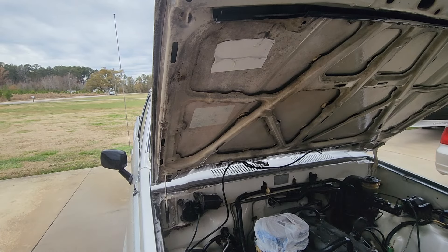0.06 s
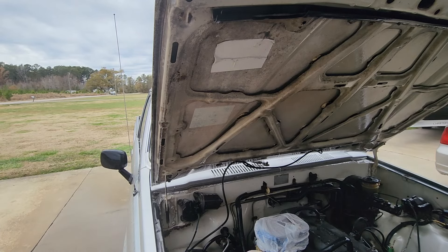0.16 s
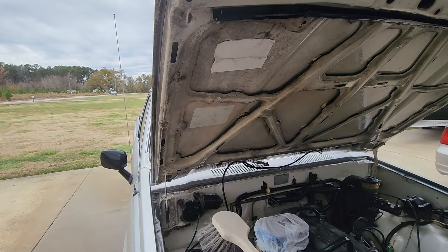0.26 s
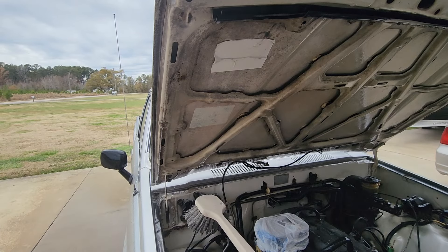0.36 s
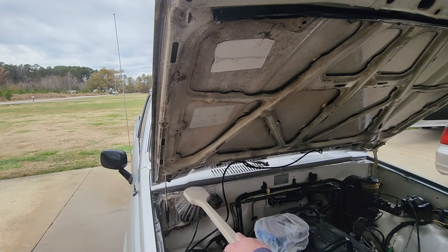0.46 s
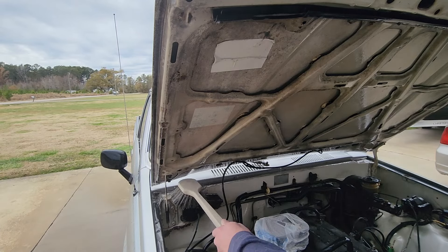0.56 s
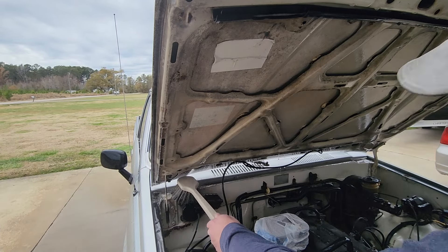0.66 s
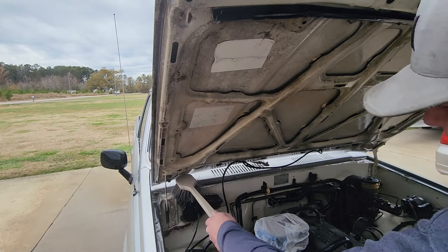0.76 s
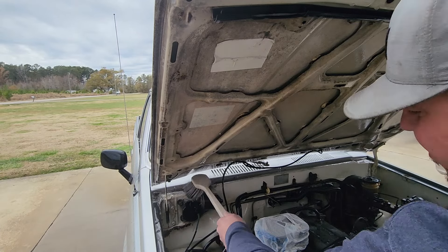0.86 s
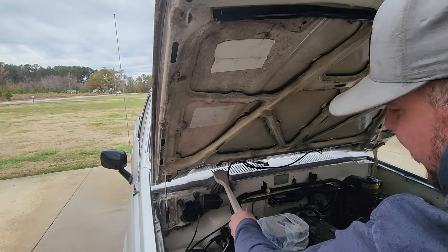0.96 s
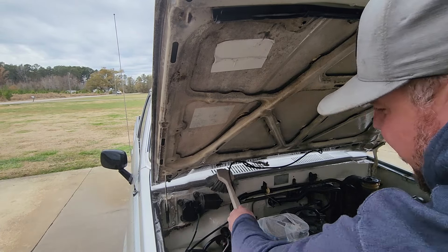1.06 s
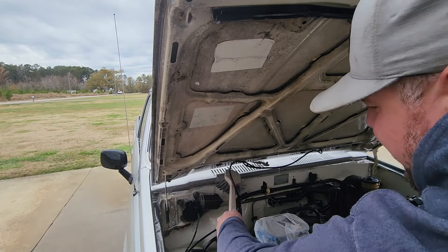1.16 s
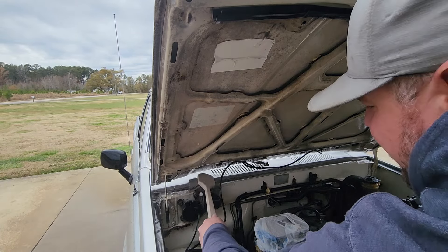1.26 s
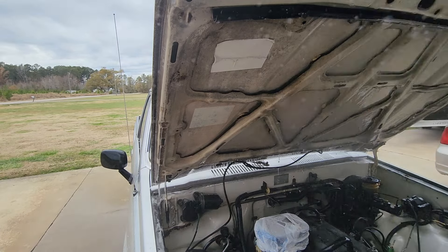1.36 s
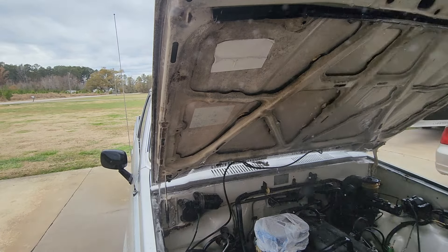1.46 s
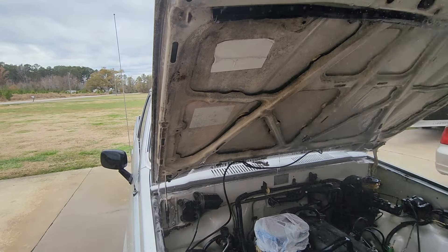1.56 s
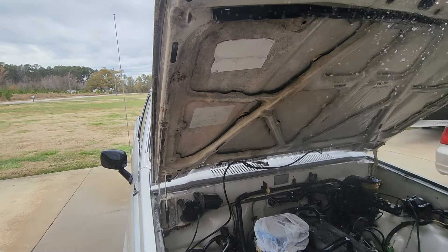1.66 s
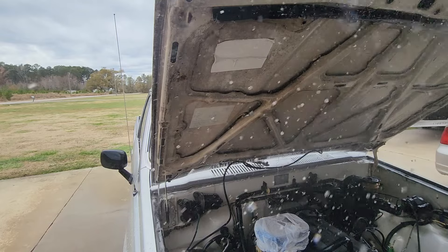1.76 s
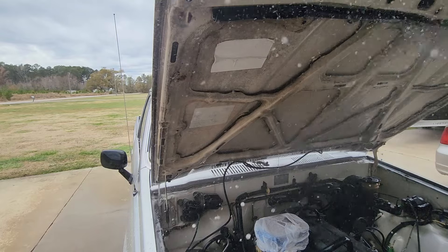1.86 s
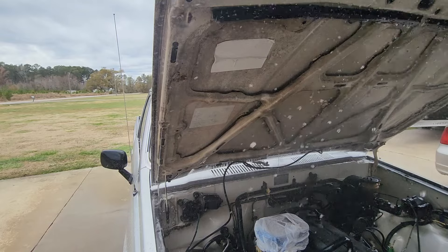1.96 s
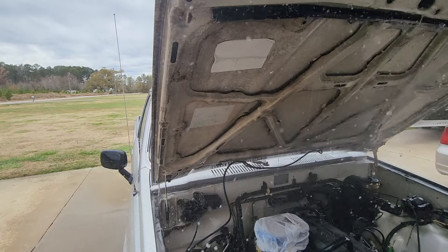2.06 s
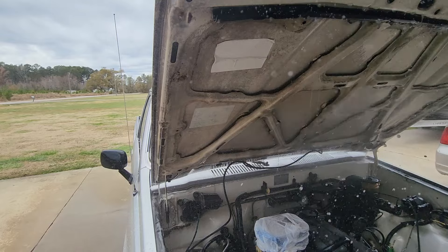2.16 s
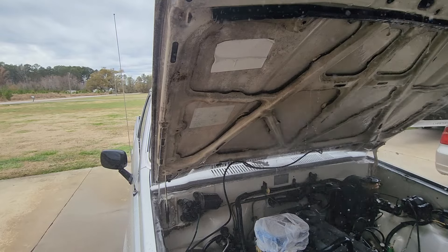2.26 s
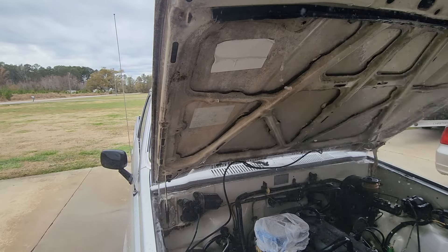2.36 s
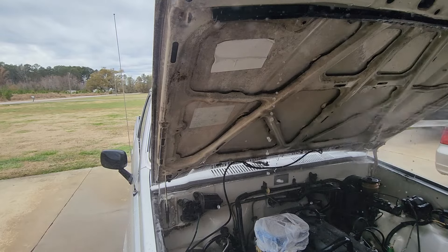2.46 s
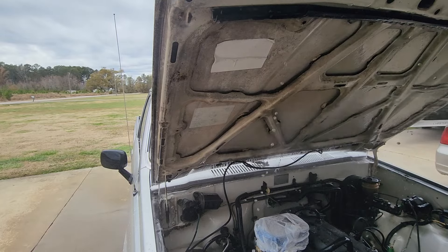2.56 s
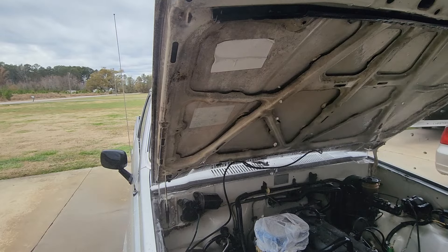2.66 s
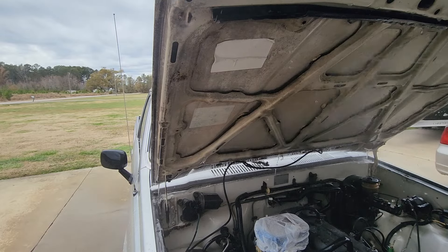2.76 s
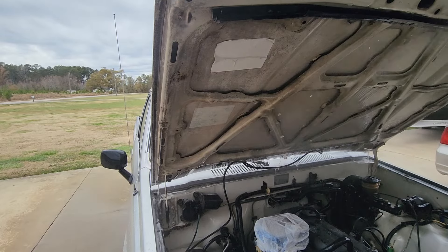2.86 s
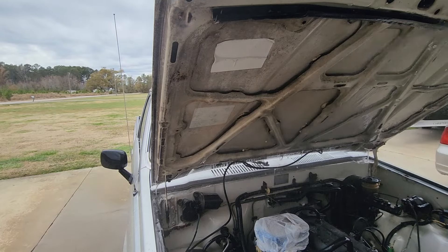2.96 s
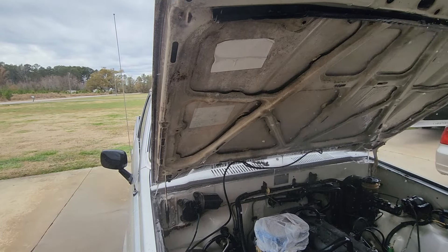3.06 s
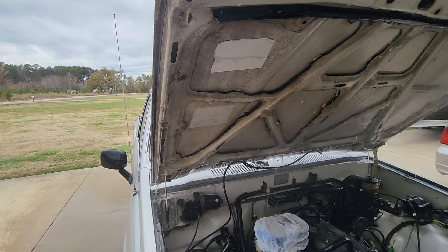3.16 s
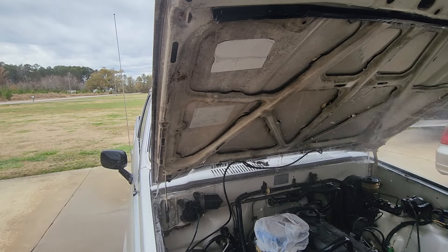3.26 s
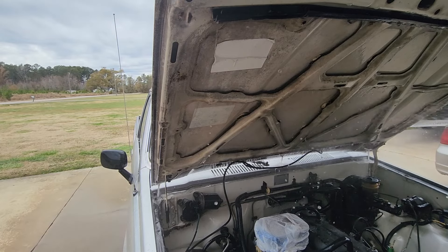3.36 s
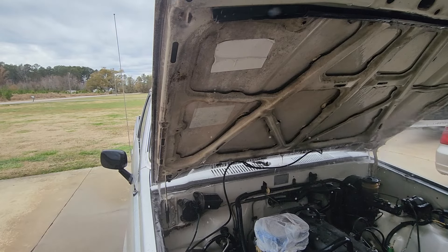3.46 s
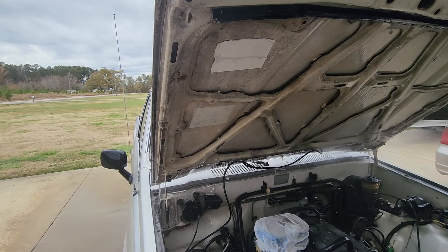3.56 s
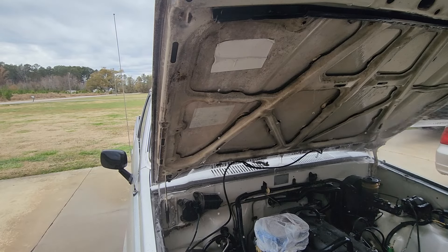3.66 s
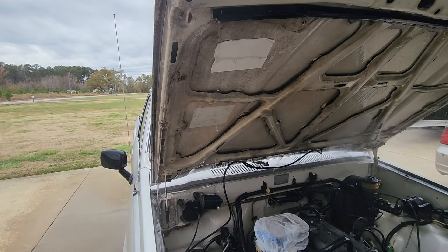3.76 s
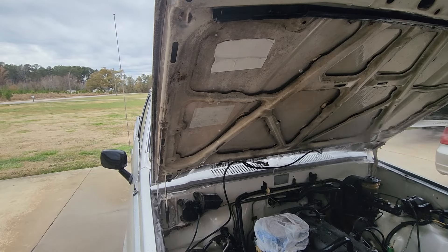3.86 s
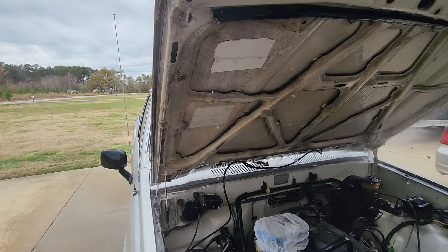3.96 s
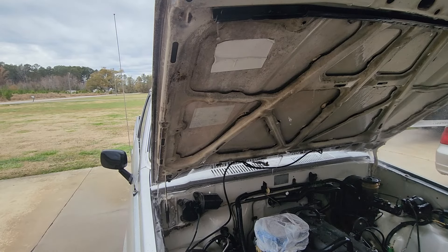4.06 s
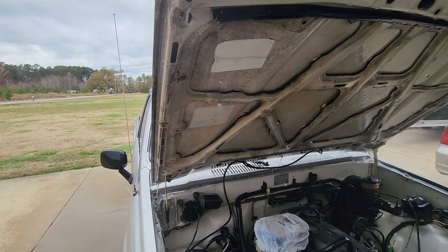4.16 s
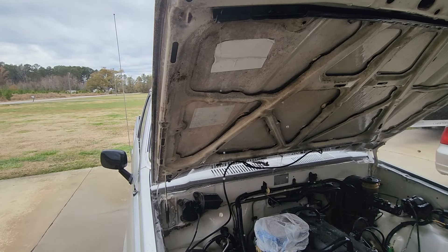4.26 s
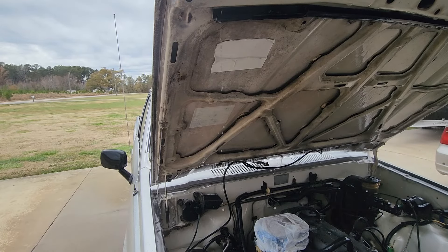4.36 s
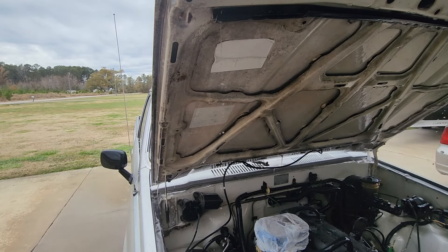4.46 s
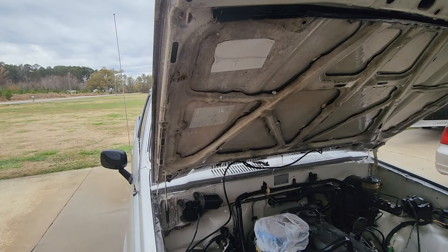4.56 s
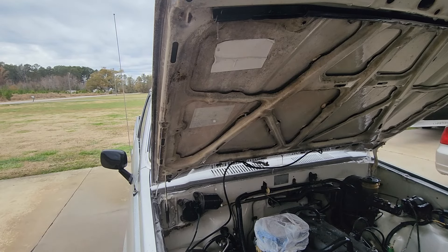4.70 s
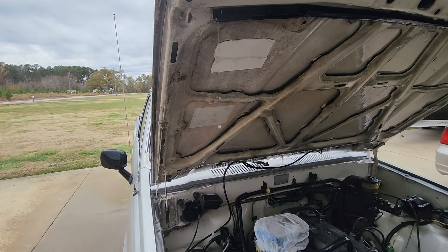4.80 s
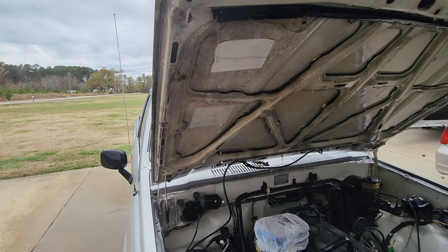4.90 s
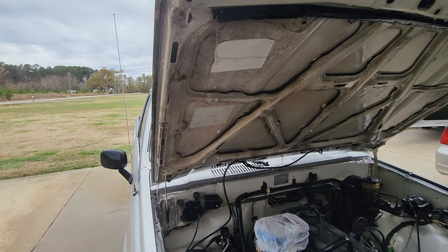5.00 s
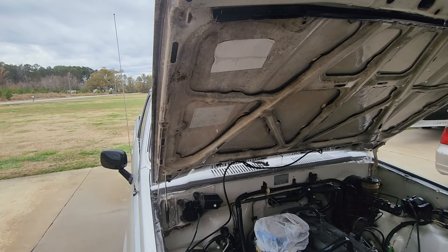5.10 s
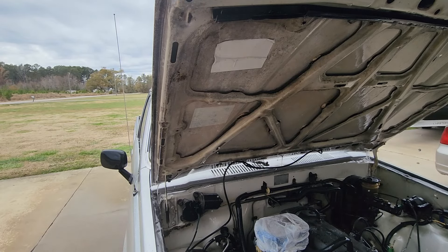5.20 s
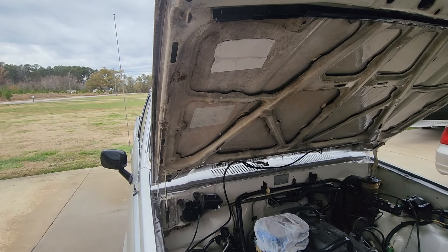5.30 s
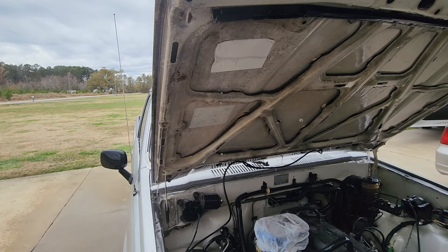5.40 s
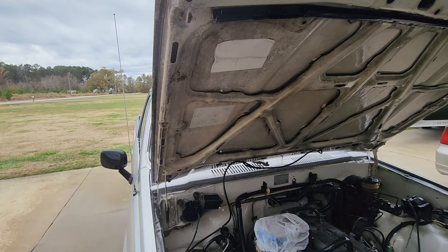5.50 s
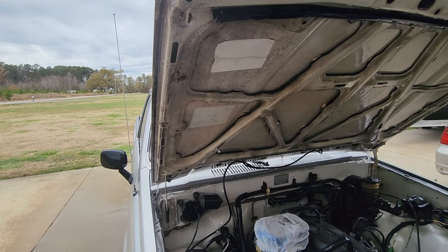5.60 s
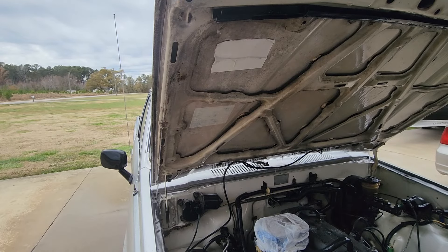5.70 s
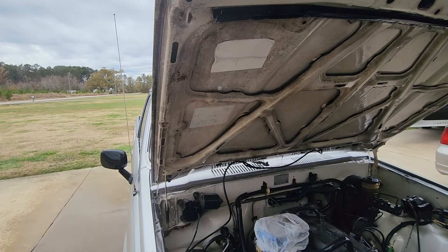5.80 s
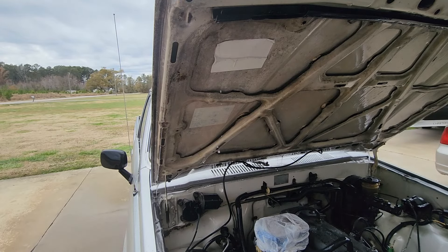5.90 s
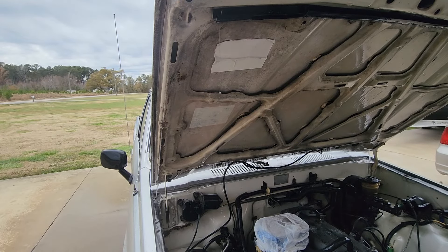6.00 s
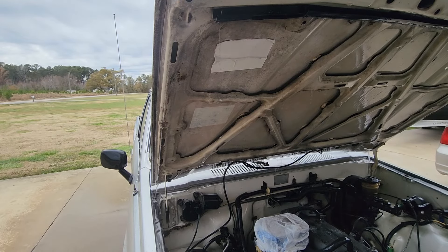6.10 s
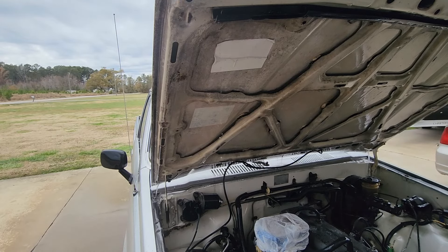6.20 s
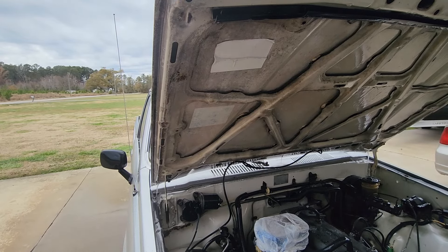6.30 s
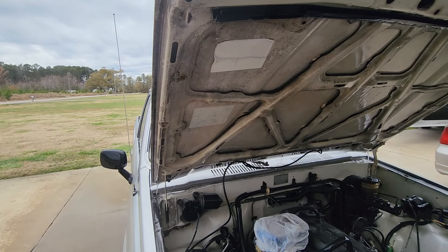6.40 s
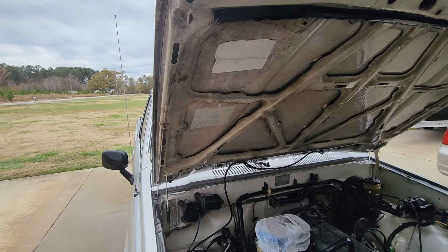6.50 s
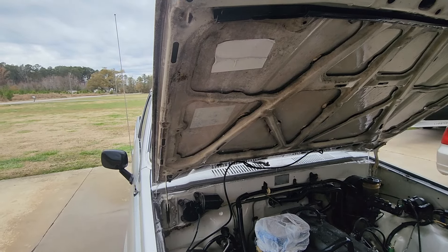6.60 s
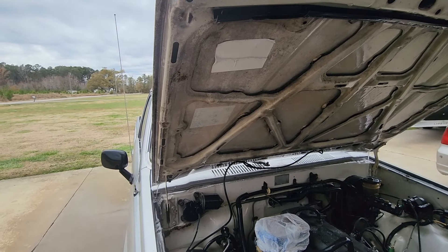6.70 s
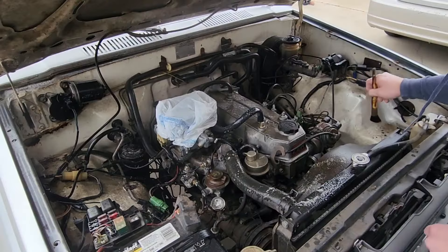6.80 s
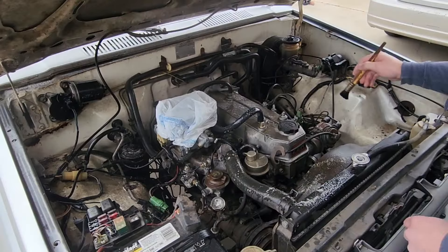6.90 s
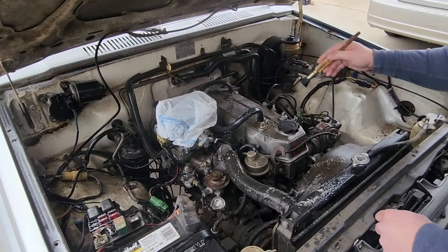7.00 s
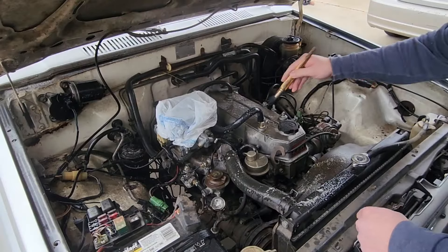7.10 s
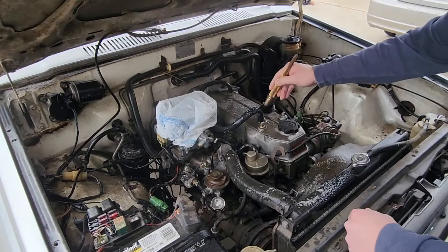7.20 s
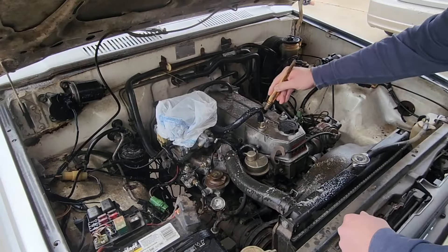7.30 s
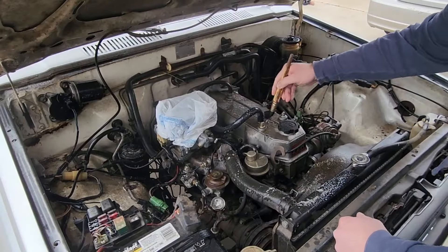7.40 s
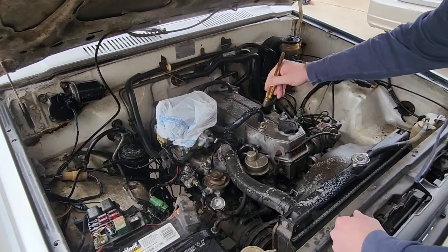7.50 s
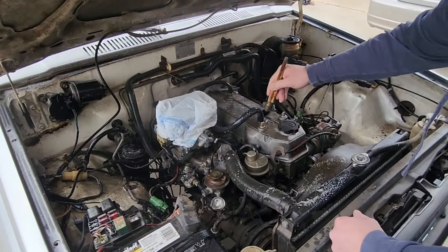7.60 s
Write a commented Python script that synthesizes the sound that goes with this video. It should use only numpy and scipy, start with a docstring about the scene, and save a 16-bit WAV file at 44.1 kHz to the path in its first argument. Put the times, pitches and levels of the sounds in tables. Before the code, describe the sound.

Outdoors, bristles rasp on metal with one hard clank, water blasts an engine compartment, then suds, drips and light brushing over a low motor hum.

```python
"""A hose jet sweeps an engine bay: random drop impacts excite panels, splash, and blow in hollows.
Around it a wet brush scrubs, its stick-slip impacts hissing and rubbing the metal; it knocks the
sheet metal, once hard, as damped modes. Soapy scrubbing follows with drips and small squelches,
as short resonances, and at last a little brush dabs. A distant motor rumbles below: noise and a hum."""
import sys
import numpy as np
from scipy import signal
from scipy.fft import rfft, irfft
from scipy.io import wavfile
from scipy.ndimage import uniform_filter1d

SR = 44100
rng = np.random.default_rng(int(sys.argv[2]) if len(sys.argv) > 2 else 0)


def pcm_store(signal):
    """Save signal as 16-bit PCM."""
    levels = np.round(np.clip(np.atleast_2d(signal), -1, 1) * 32767)
    wavfile.write(sys.argv[1], SR, levels.astype(np.int16).T)


N = 337365
TIME, FREQS = np.arange(N) / SR, np.maximum(np.arange(N // 2 + 1) * SR / N, 1)  # t/s, f/Hz

# Levels in the tables are relative: spectra are normalised, and sources may be trimmed in their functions.
# background: [t/s, motor rumble level/dB, outdoor air level/dB]
OUTDOOR_LEVELS = [(0, -43.5, -57), (1.3, -41, -53.5), (4.3, -42.5, -50.5), (5.5, -45, -53.5),
                  (7.0, -43.5, -52.5), (7.04, -45.5, -64)]
# spectra of the motor rumble, the outdoor air and the faint steady noise: [f/Hz, level/dB per Hz]
RUMBLE_SPECTRUM = [(12, -48), (20, -15.5), (64, 2), (102, 0.5), (111, -5.5), (124, -19), (135, -3.5),
                   (180, -27), (300, -120)]
AIR_SPECTRUM = [(79, -37), (135, 1), (247, -5.5), (280, -9), (350, -6), (387, -9), (650, -15), (840, -39),
                (1430, -120)]
STILLNESS_SPECTRUM = [(290, -35.5), (500, -8), (988, -5), (1130, -6.5), (1180, -5.5), (4800, -23.5),
                      (7640, -22), (16000, -29)]
# coherence of the two microphone ports: [f/Hz, likeness 0-1]
PORT_LIKENESS = [(25, .94), (80, .975), (250, .97), (600, .9), (950, .72), (1400, .3), (3000, .15),
                 (15000, .12)]
# echoes between hood and engine: [f/Hz, share of the direct sound]
BAY_ECHO_SHARE = [(500, .1), (1200, .45), (3000, .42), (15000, .3)]
# the brush head hits the bulkhead: [t/s, level/dB, contact cut-off f/Hz]
KNOCK_EVENTS = [(0.815, -51, 3500), (1.0305, -22, 6390), (1.115, -30.5, 450)]
# modes of the bulkhead: [f/Hz, level/dB, t60/s before extra damping]
BULKHEAD_MODES = [(146, -1, 0.55), (172, 0, 0.55), (470, -21, 0.41), (589, 8, 0.14), (758, 0, 0.27),
                  (1414, 6.5, 0.13), (1723, -11, 0.21), (2187, 3.5, 0.16), (2450, -18, 0.14)]
# loose parts that clatter with a blow: [band centre f/Hz, level/dB, t60/s]
CLATTER_BANDS = [(161, -10, 0.9), (373, -11.5, 0.48), (640, -1, 0.29), (1520, 3.5, 0.13),
                 (2350, 0.5, 0.075), (4000, -14, 0.06), (8000, -17, 0.14)]
# the brush nudges hoses and brackets: [t/s, f/Hz, level/dB]
BUMP_EVENTS = [(0.8149, 420, -36), (4.585, 362, -52), (4.716, 380, -50), (4.970, 800, -53),
               (5.05, 476, -46.5), (5.4445, 740, -47), (5.454, 800, -48), (5.545, 245, -40)]
# large drops fall on the parts below: [t/s, level/dB, ring f/Hz, t60/s, share of splash 0-1]
LARGE_DRIPS = [(0.787, -49, 2200, .03, .6), (4.385, -46, 4900, .03, .4), (4.438, -48, 1420, 0.038, 0.5),
               (4.453, -46, 684, .04, .6), (4.5, -46, 1400, .025, 0.5), (4.53, -46, 5500, .04, 0.5),
               (4.551, -46, 3310, 0.027, 0.37), (4.6308, -47, 2820, .03, .5),
               (4.7021, -42.5, 4030, .025, 0.6), (4.8074, -44, 3640, .02, .8),
               (4.9702, -43, 1300, 0.016, .8), (5.035, -46, 5900, .025, .4), (5.053, -50, 1860, 0.044, 0.6),
               (5.083, -47, 1500, .05, 1), (5.23, -40, 3360, 0.028, 0.4), (5.28, -40, 2050, 0.016, 0.76),
               (5.3033, -38, 3600, .025, .8), (5.436, -43, 3800, .025, .6), (5.4435, -41, 1600, .035, 1),
               (5.5137, -43, 2350, .04, 0.6), (5.657, -44, 2310, .025, 0.7), (5.6874, -42, 3970, .04, .25),
               (5.815, -43, 3620, 0.027, 0.9), (6.0777, -49, 1220, .05, .15), (6.1717, -43, 4700, .1, .95),
               (6.2362, -40, 2170, .05, 0.65), (6.323, -40, 2070, 0.017, 0.9),
               (6.3604, -42, 2190, .014, .8), (6.394, -50, 1900, 0.12, 0.8), (6.4601, -49, 2710, .045, .5),
               (6.6218, -42, 2730, 0.046, .4), (6.6615, -45, 1110, .06, 0.6), (6.7505, -45, 3300, .05, .5),
               (6.8554, -46, 1060, .025, 0.7), (6.916, -45, 8300, .02, 0.7), (6.956, -32, 1790, .009, .95)]
# suds squeezed under the bristles: [t/s, f/Hz, level/dB]
SQUELCH_EVENTS = [(4.838, 2940, -49), (5.383, 3030, -49), (5.525, 3400, -53), (5.61, 3040, -48),
                  (5.83, 3400, -49), (6.25, 2400, -54.5), (6.635, 2300, -51), (6.672, 1390, -46.5)]
# bristle tufts flick off edges: [t/s, level/dB, ring f/Hz]
FLICK_EVENTS = [(0.8142, -33, 4330), (1.4804, -28.5, 7310), (4.4726, -31, 7050), (4.64, -33, 3530),
                (4.813, -33, 7280), (5.2734, -27.5, 7600), (5.5443, -30, 6600), (5.6236, -29, 7100),
                (6.006, -32, 7630), (6.0456, -30, 5500), (6.237, -35, 7200)]
# bristle spectrum: [f/Hz, level/dB per Hz]
BRISTLE_SPECTRUM = [(350, -26), (600, -8.5), (919, -8.5), (1450, -6.5), (1680, -10), (1930, -6.5),
                    (2500, -4), (3580, 2), (5950, 1.5), (7410, 3.5), (9360, -2.5), (11800, 2), (14700, 2.5),
                    (16000, -2.5)]
# rasp resonances of the bulkhead under the bristles: [f/Hz, width/Hz, level/dB]
RASP_PEAKS = [(1475, 220, 6), (2003, 280, 7), (2155, 90, -0.5), (2806, 120, 0.5)]
# where the brush is: [t/s, left minus right level/dB]
BRUSH_POSITION = [(0, 2.5), (6.43, 3), (6.52, -13.5), (6.59, -1.5), (6.79, 0), (6.842, -8.5), (6.916, 3),
                  (6.98, -8.5), (7.3, 13)]
# light contact of the big brush between strokes: [start t/s, end t/s, rubbing level/dB, hiss level/dB]
LIGHT_CONTACT = [(0, 2.4, -65.5, -54.5), (4.3, 5.87, -56.5, -48.5), (5.879, 7.02, -58, -51.5)]
# strokes, those after 7.1 s by the little brush: [t/s, rise/s, hold/s, rubbing level/dB, hiss level/dB]
BRUSH_STROKES = [(0.043, .004, .012, -74, -43), (0.138, .01, .015, -68, -48.5),
                 (.215, .008, 0.024, -62, -47), (0.274, .008, .02, -57, -46),
                 (0.344, .05, .008, -58, -42.5), (0.383, .004, .004, -68, -45),
                 (0.504, .005, .006, -72, -44.5), (0.62, .008, 0.021, -74, -49.5),
                 (0.7, .006, .01, -72, -46), (0.81, .005, .03, -57, -49), (0.961, .003, 0.028, -53.5, -45),
                 (1.029, 0.01, 0.066, -47, -46), (1.154, 0.065, 0.048, -39.5, -38),
                 (1.204, .015, 0.02, -38.5, -48), (1.25, .02, 0.067, -52.5, -56),
                 (1.35, 0.025, 0.053, -45, -46.5), (1.46, 0.033, 0.029, -48, -44),
                 (1.482, 0.013, 0.078, -39, -37.5), (1.583, .02, 0.029, -54.5, -59),
                 (4.83, 0.024, .02, -60, -53), (5.186, .015, .025, -47, -44.5),
                 (5.283, 0.0062, 0.065, -51, -54), (5.43, .0055, .02, -51, -49),
                 (5.534, 0.22, 0.1, -52.5, -49), (5.752, 0.056, 0.055, -58, -51),
                 (6.014, .005, 0.07, -70, -47.5), (6.486, 0.0033, 0.069, -44, -41),
                 (6.6, .015, .02, -67, -48), (6.656, .01, 0.057, -56, -43.5),
                 (6.747, 0.017, 0.061, -55, -45), (6.826, .02, 0.018, -48.5, -51),
                 (6.971, 0.05, 0.034, -46.5, -43.5), (7.137, .04, 0.029, -86, -68),
                 (7.314, .004, 0.086, -78.5, -70.5), (7.425, 0.007, 0.0053, -53, -47),
                 (7.466, .015, .034, -69, -54), (7.609, 0.088, 0.016, -61.5, -51.5)]
# hollows that the jet blows in passing: [centre t/s, length/s, f/Hz, level/dB, glide/octaves per s]
HOLLOW_EVENTS = [(1.675, 0.081, 740, -24.5, -0.69), (1.698, 0.055, 3050, -23, -0.4),
                 (1.881, 0.074, 4130, -19.5, 0.041), (1.905, 0.11, 1607, -19, 0.49),
                 (1.97, 0.089, 900, -33, -1.9), (1.972, 0.043, 4300, -18, -1.3),
                 (1.997, .13, 2180, -17.5, -0.23), (2.033, 0.066, 2530, -25, -0.0086),
                 (2.05, .17, 804, -24, -.6), (2.146, 0.055, 2390, -18, -0.63),
                 (2.156, 0.062, 2190, -22, 0.25), (2.155, .17, 780, -24.5, -0.68),
                 (2.514, .07, 805, -24, 0.23), (2.827, 0.1, 544, -27, 0.047),
                 (3.228, 0.044, 2180, -20.5, -0.088), (3.292, 0.088, 1273, -22, -0.21),
                 (2.951, 0.064, 1310, -25, -0.0058), (4.185, .04, 1447, -25, 0)]
# the jet sweeps over the engine: [t/s, drumming on metal level/dB, splashing level/dB]
JET_SWEEP = [(1.65, -23, -23.5), (1.695, -22.5, -20), (1.76, -25.5, -21), (1.95, -30, -16),
             (2.16, -36, -18.5), (2.21, -35, -26.5), (2.26, -26.5, -25.5), (2.33, -25.5, -25.5),
             (2.52, -27.5, -25.5), (2.61, -30.5, -29), (2.68, -22.5, -25.5), (2.78, -31.5, -28),
             (2.81, -23, -25.5), (2.89, -30, -23.5), (2.945, -22, -22), (3.04, -25, -21), (3.09, -20, -21),
             (3.17, -28.5, -21.5), (3.3, -22, -20.5), (3.4, -27.5, -28), (3.45, -25.5, -27.5),
             (3.47, -24.5, -21.5), (3.55, -29, -22.5), (3.57, -23, -22.5), (3.67, -30.5, -27.5),
             (3.73, -26.5, -27), (4.03, -25, -24.5), (4.22, -31, -28), (4.32, -35.5, -33.5)]
# spectra of the spray and the fine mist: [f/Hz, level/dB per Hz]
SPRAY_SPECTRUM = [(65, -42), (110, -11.5), (156, -10), (320, -9.5), (371, -9.5), (557, -5.5), (622, -4.5),
                  (776, -4.5), (1000, -7), (1210, -6), (1680, -5.5), (2260, -6), (5080, -7.5), (7490, -7.5),
                  (9000, -13), (11700, -39.5), (19800, -120)]
MIST_SPECTRUM = [(5590, -52), (9500, -12.5), (11500, -4), (14900, -3.5), (15700, -5), (16000, -7)]
# panel resonances under the jet: [f/Hz, width/Hz, level/dB]
PANEL_PEAKS = [(160, 22, 7), (383.5, 34, 5), (508, 35, 4.5), (558.5, 26, 6.5), (770, 71, 2.5),
               (935, 18, 1.5), (1258, 110, 3.5), (1540, 46, 3.5)]

JET_OPENS_S, JET_CLOSES_S, JET_FADE_DB_PER_S = 1.6435, 4.237, 146
JET_LAG_S = 0.0003026  # delay of the right port behind the left


def from_db(db):
    """Amplitude ratio: decibels to gain."""
    return 10 ** (np.asarray(db) / 20)


def rms_one(x):
    """Energy normalisation: scale to rms 1."""
    return x / np.sqrt(np.mean(x ** 2) + 1e-20)


def in_time(rows):
    """Linear interpolation: each column of a curve at every sample."""
    s, *columns = np.transpose(rows)
    return [np.interp(TIME, s, column) for column in columns]


def at_hz(points, hz):
    """Logarithmic interpolation: read a spectrum on a log-frequency axis."""
    known_hz, values = np.transpose(points)
    return np.interp(np.log(hz), np.log(known_hz), values)


def likeness(hz):
    """Spatial coherence: how alike the two ports hear a frequency."""
    return np.clip(at_hz(PORT_LIKENESS, hz), 0, 1)


def pan(db):
    """Interaural level difference: left and right gains."""
    return from_db(np.array([[.5], [-.5]]) * db)


def gate(start, end):
    """Switching envelope: on between two times, with 3 ms edges."""
    return np.interp(TIME, [start - .003, start, end, end + .003], [0, 1, 1, 0])


def drift(rate):
    """Random modulation: straight lines between chance values, rate per second, rms 1."""
    knots = rng.standard_normal(4096)
    return rms_one(np.interp(TIME * rate, np.arange(len(knots)), knots))


def noise(size=N):
    """Gaussian noise: two unrelated white channels."""
    return rng.standard_normal((2, size))


def partly_alike_noise(size, hz):
    """Partial coherence: common and separate noise mixed as the ports hear this frequency."""
    alike = likeness(hz)
    return np.sqrt(alike) * rng.standard_normal(size) + np.sqrt(1 - alike) * noise(size)


def grains(per_s, spread_db):
    """Shot noise: two unrelated streams of tiny impacts of uneven size, rms 1."""
    size_db = spread_db * np.minimum(rng.exponential(1, (2, N)), 5)
    impacts = from_db(size_db) * rng.choice([-1, 1], (2, N))
    return rms_one(impacts * (rng.random((2, N)) < per_s / SR))


def colour(pair, spectrum, peaks=(), lag_s=0, low_hz=0, high_hz=SR, order=4):
    """Spectral filtering with partial coherence: spectrum, resonances, soft band edges; rms 1."""
    level_db = at_hz(spectrum, FREQS)
    for hz, width, db in peaks:
        level_db = level_db + db / (1 + (2 * (FREQS - hz) / width) ** 2)
    outside = np.maximum(np.maximum(spectrum[0][0] / FREQS, FREQS / spectrum[-1][0]), 1)
    low_edge = 1 + (low_hz / FREQS) ** (2 * order)
    high_edge = 1 + (FREQS / high_hz) ** (2 * order)
    mid, side = rfft(pair) * from_db(level_db) / (outside ** order * np.sqrt(low_edge * high_edge))
    # the ports hear the bass alike, the treble apart
    alike = likeness(FREQS)
    mid, side = mid * np.sqrt(1 + alike), side * np.sqrt(1 - alike)
    right = (mid - side) * np.exp(-2j * np.pi * FREQS * lag_s)
    return rms_one(irfft([mid + side, right], N))


def resonate(x, hz, width):
    """Damped oscillator: a two-pole resonance of gain 1."""
    r = np.exp(-np.pi * width / SR)
    feedback = [1, -2 * r * np.cos(2 * np.pi * hz / SR), r * r]
    return signal.lfilter(np.array([1, 0, -1]) * (1 - r * r) / 2, feedback, x)


def add(track, s, sound):
    """Superposition: mix a short sound in at a time."""
    at = max(round(s * SR), 0)
    track[:, at:at + sound.shape[-1]] += sound[..., :N - at]


def bay(pair, longest_s=.022, count=40):
    """Comb interference: short echoes off hood and engine ripple the spectrum of water and bristles."""
    echoes = np.zeros((2, N))
    for ear in echoes:
        lags = (longest_s * SR * rng.uniform(.1, 1, count)).astype(int)
        ear[lags] = rng.standard_normal(count) / np.sqrt(count)
    return irfft(rfft(pair) * (1 + at_hz(BAY_ECHO_SHARE, FREQS) * rfft(echoes)), N)


def stillness():
    """Stationary noise: a faint steady wash under everything."""
    return colour(noise(), STILLNESS_SPECTRUM) * from_db(-65)


def outdoors(motor_hz=100.3, motor_db=-53.5):
    """Frequency and amplitude modulation: a far motor rumbles and hums unsteadily under faint air."""
    rumble_db, air_db = in_time(OUTDOOR_LEVELS)
    turns = np.cumsum(motor_hz + 2.5 * drift(19)) / SR
    hum = np.sqrt(2) * np.sin(2 * np.pi * turns) * from_db(motor_db + 1.3 * drift(5.8))
    rumble = colour(noise(), RUMBLE_SPECTRUM) * from_db(rumble_db - 2.5)
    air = colour(noise(), AIR_SPECTRUM, lag_s=0.00037) * from_db(air_db)
    return hum + rumble + air


def knocks(ring_db=-11, damping=1.1, crack_db=6, crack_hz=2100, crack_t60=0.01):
    """Modal excitation: a blow cracks, rings the panel and clatters loose parts; contact low-passes it."""
    out, t = np.zeros((2, N)), TIME[:SR]
    for s, db, contact_hz in KNOCK_EVENTS:
        crack = resonate(resonate(noise(SR), crack_hz, crack_hz), crack_hz, 2 * crack_hz)
        blow = rms_one(crack) * from_db(crack_db - 60 * t / crack_t60)
        for hz, mode_db, t60 in BULKHEAD_MODES:
            decay = from_db(ring_db + mode_db - 60 * t * damping / t60)
            blow += decay * np.sin(2 * np.pi * hz * t) * rng.choice([-1, 1])
        for hz, part_db, t60 in CLATTER_BANDS:
            octave = [hz / np.sqrt(2), hz * np.sqrt(2)]
            band = signal.butter(2, octave, "band", fs=SR, output="sos")
            part = signal.sosfilt(band, partly_alike_noise(SR, hz))
            blow += rms_one(part) * from_db(part_db - 3.5 - 60 * t / t60)
        contact = signal.butter(1, min(contact_hz, SR / 3), fs=SR, output="sos")
        add(out, s, from_db(db) * signal.sosfilt(contact, blow))
    return out * pan(2.0)


def bumps(thud_db=3, rise_s=.001, t60=.055):
    """Heavily damped vibration: a short thud from each part that is nudged."""
    out, t = np.zeros((2, N)), TIME[:SR // 5]
    for s, hz, db in BUMP_EVENTS:
        rattle = rms_one(resonate(rng.standard_normal(SR // 2), hz, hz * .35))[-len(t):]
        thud = np.sin(2 * np.pi * hz * t) + rattle / np.sqrt(2)
        add(out, s, thud * from_db(db + thud_db - 60 * t / t60) * np.minimum(t / rise_s, 1))
    return out * pan(4.4)


def foam(pops_per_s=50, level_db=-55, spread_db=6, t60=0.019, fizz_db=-60, count=12):
    """Bubble bursts: suds fizz steadily until the big brush ends; larger bubbles ring briefly."""
    wet = gate(0, LIGHT_CONTACT[-1][1])
    out = colour(grains(4000, 3.0), BRISTLE_SPECTRUM, low_hz=3800) * wet * from_db(fizz_db)
    t = TIME[:SR // 25]
    for hz in np.geomspace(2800, 13000, count):
        for at in np.flatnonzero(rng.random(N) < wet * pops_per_s / count / SR):
            pop = rms_one(resonate(noise(len(t)), hz, hz / 6)) * from_db(-60 * t / t60)
            pop_db = level_db + spread_db * rng.random()
            add(out, at / SR, pop * from_db(pop_db) * pan(rng.normal(0, 3.2)))
    return out


def drips(droplet_db=-53, spread_db=7, impact_db=1.5, splash_width=.6, count=60, rise_s=.0004):
    """Impact excitation: each drop is part plink, part sharp splash; some large among many small."""
    out, t = np.zeros((2, N)), TIME[:SR // 10]
    droplets = []
    for when, pitch, size in rng.random((count, 3)):
        s = np.interp(when, [0, 1], [4.35, 6.95])
        hz = 2500 * (9000 / 2500) ** pitch
        droplets.append((s, droplet_db + spread_db * size, hz, 0.024, .65))
    for s, db, hz, t60, share in LARGE_DRIPS + droplets:
        share = np.clip(share, 0, 1)
        plink = np.sqrt(2) * np.sin(2 * np.pi * (hz * t + rng.random((2, 1)) / 2))
        splash = rms_one(resonate(noise(len(t)), hz, hz * splash_width * np.sqrt(share) + 1))
        tap = np.sqrt(1 - share) * plink + np.sqrt(share) * splash
        add(out, s, tap * np.minimum(t / rise_s, 1) * from_db(db + impact_db - 60 * t / t60))
    return out


def squelches(life_s=0.012, rise_per_s=8.6, width_hz=450):
    """Cavity resonance: air pockets in the suds shrink as they are squeezed, so their rough ring rises."""
    out, t = np.zeros((2, N)), TIME[:SR // 14]
    read_s = t * (1 + rise_per_s * (t / 2 - life_s)) + .01  # read ever faster to raise the pitch
    swell = t / life_s * np.exp(1 - t / life_s)
    for s, hz, db in SQUELCH_EVENTS:
        ring = rms_one(resonate(noise(SR // 4), hz, width_hz))
        glide = np.array([np.interp(read_s, TIME[:SR // 4], ear) for ear in ring])
        add(out, s - life_s / 2, glide * swell * from_db(db))
    return out


def flicks(sizzle_db=-12, sizzle_t60=0.11, sizzle_width_hz=1500,
           crack_db=-2, crack_t60=.015, crack_low_hz=3500):
    """Elastic release: a tuft springs free with a sharp, wet crack and a short sizzle."""
    out, t = np.zeros((2, N)), TIME[:SR // 6]
    bright = signal.butter(1, crack_low_hz, "high", fs=SR, output="sos")
    for s, db, hz in FLICK_EVENTS:
        sizzle = rms_one(resonate(noise(len(t)), hz, sizzle_width_hz))
        sizzle = sizzle * from_db(sizzle_db - 60 * t / sizzle_t60)
        crack = rms_one(signal.sosfilt(bright, noise(len(t))))
        crack = crack * from_db(crack_db - 60 * t / crack_t60)
        add(out, s, (sizzle + crack) * from_db(db))
    return out


def stroke(start, rise_s, hold_s, release_s=0.021):
    """Contact envelope: the bristles press in, hold, and lift off exponentially."""
    pressed = np.clip(1 + (TIME - start) / rise_s, 0, 1)
    return pressed * np.exp(-np.clip((TIME - start - hold_s) / release_s, 0, 20))


def brush(snaps_per_s=9000, snap_spread_db=2.3, judder_db=1.35, rasp_top_hz=2300):
    """Stick-slip friction: bristles hiss themselves and rub a lower sound out of the metal."""
    hand = from_db(1.8 * drift(35))
    contacts = [(gate(start, end) * hand, levels) for start, end, *levels in LIGHT_CONTACT]
    contacts += [(stroke(s, rise, hold), levels) for s, rise, hold, *levels in BRUSH_STROKES]
    # unrelated contacts add in power
    power = sum(np.outer(from_db(levels), shape) ** 2 for shape, levels in contacts)
    rub_gain, hiss_gain = np.sqrt(power)
    slips = bay(grains(snaps_per_s / 2, snap_spread_db))
    # the bulkhead rasps until the jet closes; afterwards the brush is on the engine
    on_bulkhead = colour(slips, BRISTLE_SPECTRUM, RASP_PEAKS, lag_s=.0002, high_hz=rasp_top_hz, order=3)
    on_engine = colour(slips, BRISTLE_SPECTRUM, lag_s=0.00022, high_hz=2600, order=3) * from_db(-1.5)
    rub = np.where(TIME < JET_CLOSES_S, on_bulkhead, on_engine) * rub_gain
    snaps = bay(grains(snaps_per_s, snap_spread_db))
    hiss = colour(snaps, BRISTLE_SPECTRUM, low_hz=3400) * hiss_gain * from_db(-2.5)
    return (rub + hiss) * from_db(judder_db * drift(70))


def hollows(gurgle_db=-10, gurgle_s=0.041, count=70, q=24, flutter_db=1.4, flutter_per_s=150):
    """Cavity resonance: each hollow swells, glides and fades as the jet crosses; small pockets gurgle."""
    out, gurgles = np.zeros((2, N)), []
    jet_s, drum_db, _ = np.transpose(JET_SWEEP)
    for when, pitch, size, glide in rng.random((count, 4)):
        s = np.interp(when, [0, 1], [2.26, 4.1])
        hz = 480 * (2800 / 480) ** pitch
        db = np.interp(s, jet_s, drum_db) + gurgle_db - 4 * size - 1.5 * pitch
        gurgles.append((s, gurgle_s, hz, db, 4 * glide))
    for s, length, hz, db, glide in HOLLOW_EVENTS + gurgles:
        swell = np.hanning(int(length * SR))
        t = TIME[:len(swell)]
        ring = resonate(partly_alike_noise(SR // 2, hz), hz, hz / q)
        # the ring's own chance swells are evened out
        ring = ring / np.sqrt(uniform_filter1d(np.mean(ring ** 2, axis=0), size=600))
        # reading at a changing speed glides the pitch
        read_s = np.cumsum(2 ** (glide * (t - length / 2))) / SR + .1
        gliding = np.array([np.interp(read_s - lag, TIME[:SR // 2], ear)
                            for ear, lag in zip(ring, (0, JET_LAG_S))])
        # the stream breaks up over a hollow
        flutter = np.interp(t * flutter_per_s, np.arange(64), rng.standard_normal(64))
        add(out, s - length / 2, gliding * swell * from_db(db + flutter_db * flutter))
    return out * pan(3.9)


def glance(pair, count=14, share=.36, per_s=26, longest_s=.0035):
    """Time-varying interference: as the impact wanders, nearby surfaces take turns reflecting it."""
    lags = (longest_s * SR * rng.uniform(.05, 1, count)).astype(int)
    echoes = sum(np.roll(pair, lag, axis=1) * drift(per_s) for lag in lags) / np.sqrt(count)
    return (pair + share * echoes) / np.sqrt(1 + share ** 2)


def jet(drops_per_s=22000, drop_spread_db=2.6, drum_per_s=6500, drum_spread_db=2.0, sputter_db=1.0,
        slosh_db=0.05, drum_lag_s=0.00025, blobs_per_s=1800, blob_spread_db=2.5, splatter_db=-6, clump_db=3):
    """Shot-noise excitation: drops drum on sheet metal, splatter in clumps, splash and break into mist."""
    drum_db, splash_db = in_time(JET_SWEEP)
    # the stream starts at once, sputters and dies away when the trigger is let go
    fade_db = JET_FADE_DB_PER_S * np.maximum(TIME - JET_CLOSES_S, 0)
    flow = gate(JET_OPENS_S, TIME[-1]) * from_db(sputter_db * drift(110) - fade_db)

    impacts = bay(grains(drum_per_s, drum_spread_db))
    drum = colour(impacts, SPRAY_SPECTRUM, PANEL_PEAKS, drum_lag_s, high_hz=1494, order=2)
    boom = signal.sosfiltfilt(signal.butter(3, 640, fs=SR, output="sos"), drum)
    # small parts boom less; from 1.93 s the jet moves on to the broad panels
    boom_db = np.interp(TIME - 1.93, [0, .1], [-5, -2.5])
    drum = drum + boom * (from_db(boom_db) - 1)
    drum = drum * from_db(drum_db + 4.0 + slosh_db * drift(35)) * pan(2.25)

    blobs = grains(blobs_per_s, blob_spread_db)
    splatter = colour(blobs, SPRAY_SPECTRUM, lag_s=JET_LAG_S, low_hz=1095, high_hz=3300)
    clumped_db = (drum_db + splash_db) / 2 + splatter_db + clump_db * drift(40)
    splatter = splatter * from_db(clumped_db) * pan(2.05)

    drops = bay(grains(drops_per_s, drop_spread_db))
    splash = colour(drops, SPRAY_SPECTRUM, lag_s=JET_LAG_S, low_hz=1640, order=3)
    splash = splash * from_db(splash_db - 1.0) * pan(5.3)
    # mist follows 0.77 of the splash's swing about its usual -24 dB
    mist_db = -23 + 0.77 * (splash_db + 24)
    mist = colour(drops, MIST_SPECTRUM, lag_s=JET_LAG_S) * from_db(mist_db) * pan(-1.0)
    return (glance(drum + splatter + splash) + mist) * flow


def scene():
    """Superposition: background, knocks, brush and jet in the open air."""
    brush_pan_db, = in_time(BRUSH_POSITION)
    # the scrubbing stops abruptly until the little brush begins
    pause = gate(7.024, 7.11)
    scrubbing = foam() + drips() + squelches() + flicks() + brush()
    scrubbing = scrubbing * pan(brush_pan_db) * (1 - pause)
    return stillness() + outdoors() + knocks() + bumps() + scrubbing + hollows() + jet()


def record(dry):
    """Port resonance: the microphone ports lift one treble band and swallow the next; the top is cut."""
    heard = dry + 0.38 * resonate(dry, 7460, 560) - .5 * resonate(dry, 9390, 1300)
    top_cut = signal.ellip(12, .1, 80, 15700, fs=SR, output="sos")
    return signal.sosfilt(top_cut, np.clip(heard, -1, 1))


dry = scene()
out = record(dry)
pcm_store(out)
```